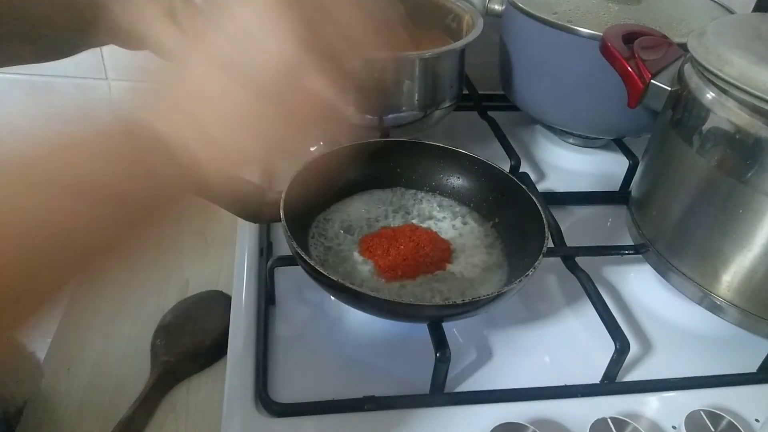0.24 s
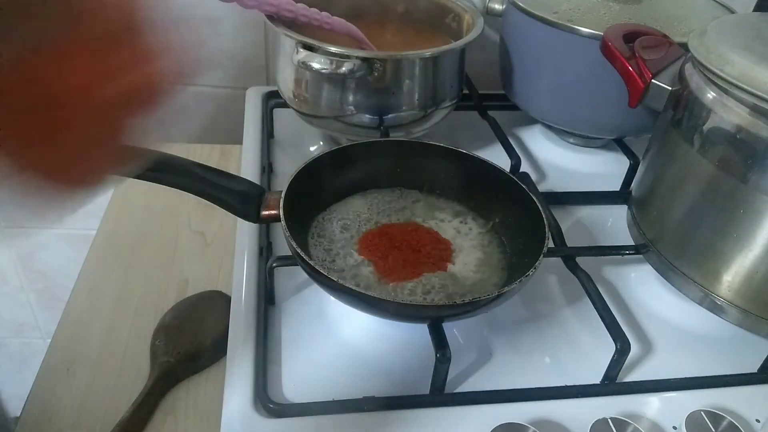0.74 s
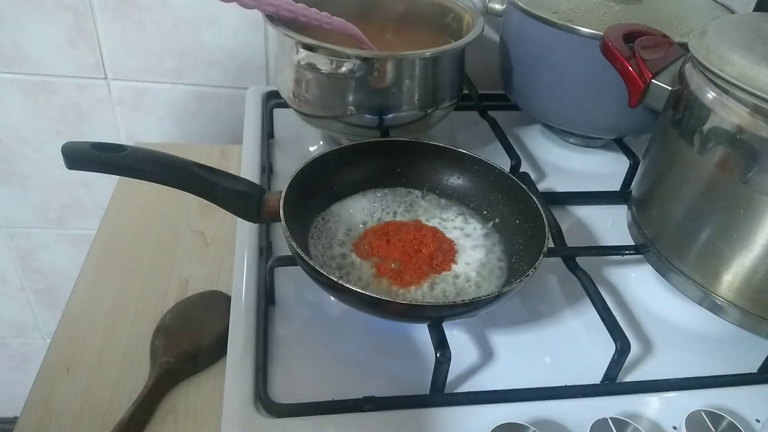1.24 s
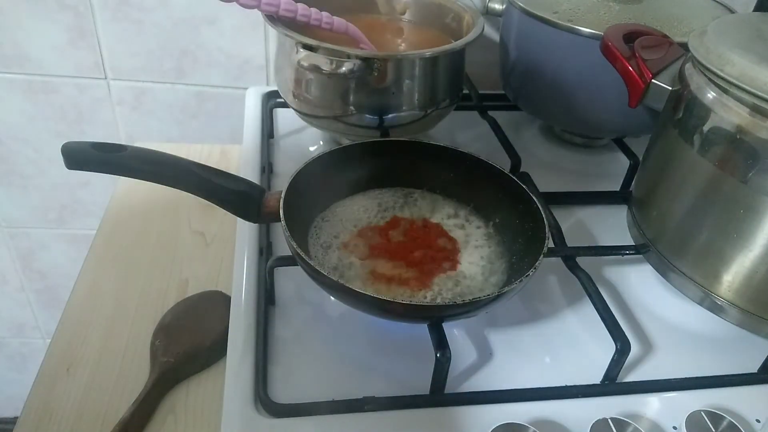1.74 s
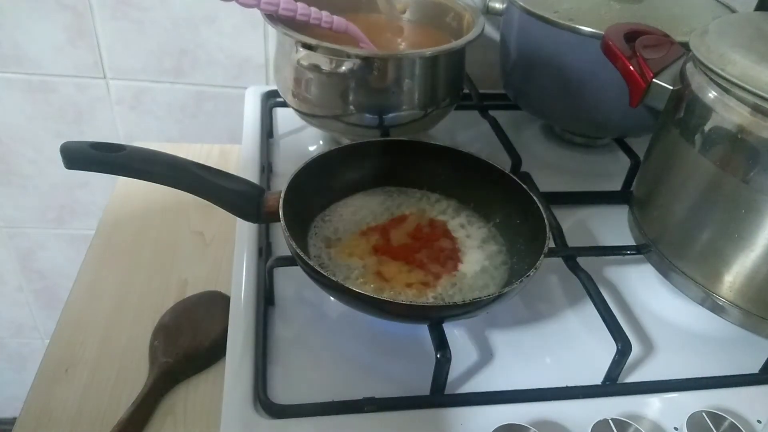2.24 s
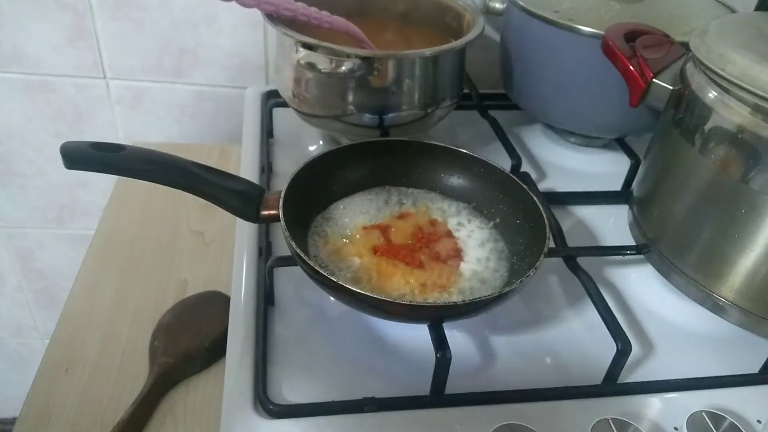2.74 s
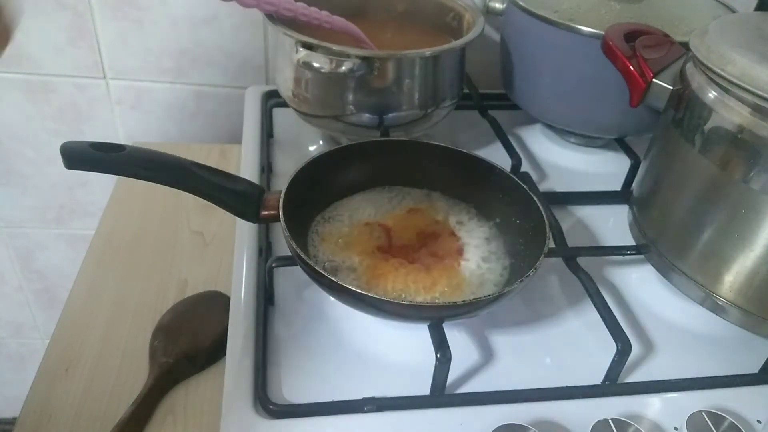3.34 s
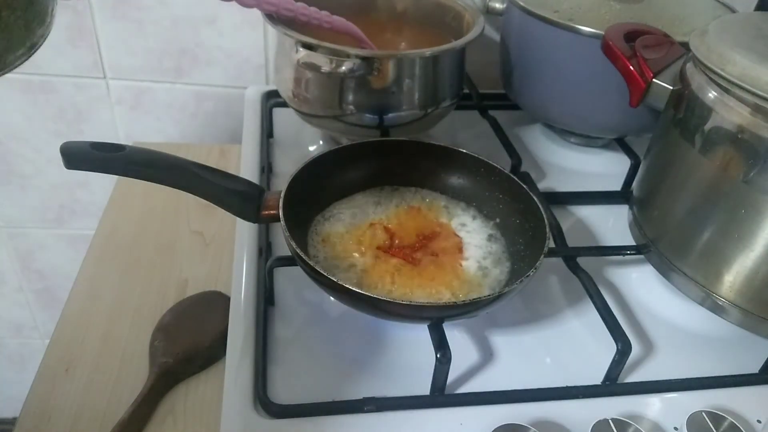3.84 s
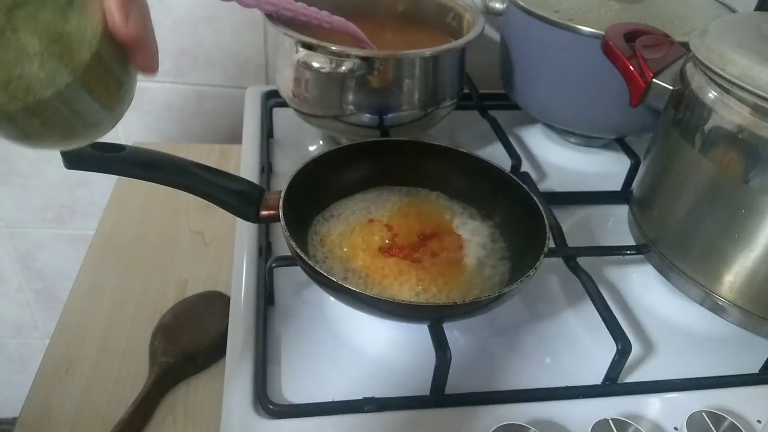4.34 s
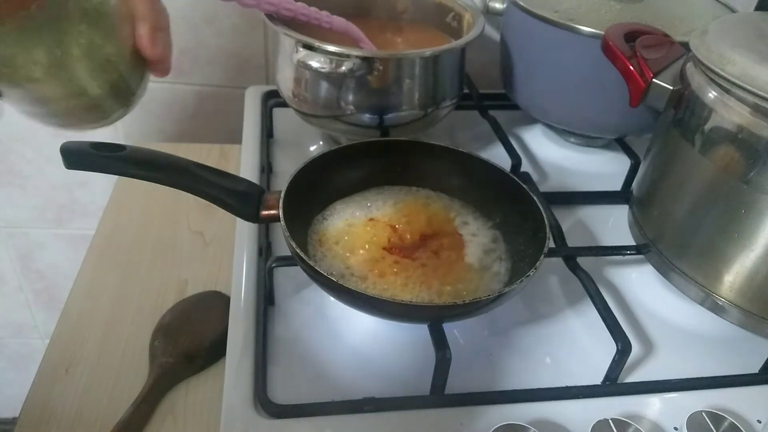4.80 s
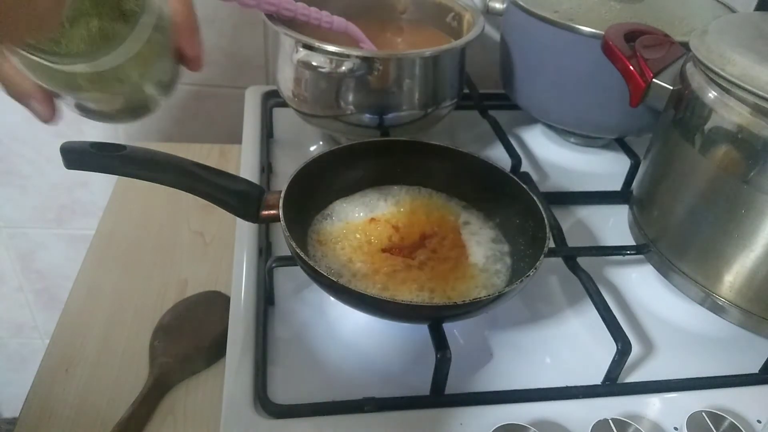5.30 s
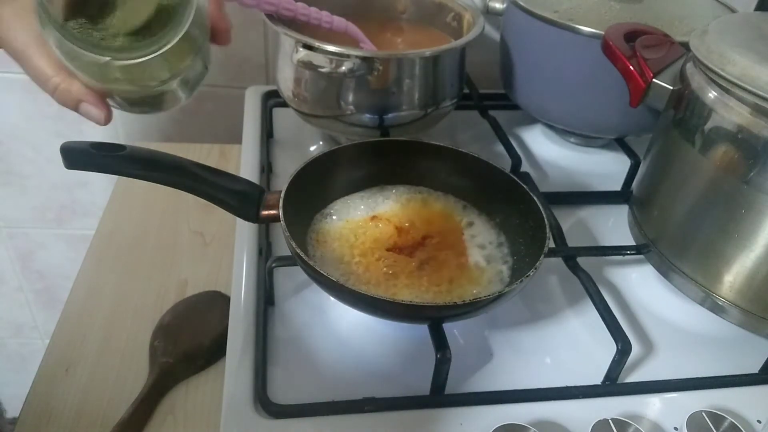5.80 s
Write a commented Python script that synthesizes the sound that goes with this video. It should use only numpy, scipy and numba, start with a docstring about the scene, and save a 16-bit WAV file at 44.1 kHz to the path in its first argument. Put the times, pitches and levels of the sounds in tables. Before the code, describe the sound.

Steady crisp sizzle and popping fat in a tiled kitchen, broken by hard wooden thumps and a rattling, scraping jar lid being unscrewed.

```python
"""Butter foaming in a pan, tiled kitchen

A frying pan on a gas stove, heard by a phone about a metre away; burner and air wash low behind it.
Steam bubbles burst as short ringing grains over a fine hiss, and fat spits in puffs of bright noise.
Jars knock on a wooden counter and a metal lid clinks and scrapes on a glass jar, as modes struck to ring.
The floor thuds under the cook's feet as filtered noise; delay lines echo pan and hands off the tiles."""
import sys
import numpy as np
from scipy import signal
from scipy.fft import rfft, irfft
from scipy.io import wavfile
from scipy.ndimage import uniform_filter1d
from numba import njit

SR = 44100
rng = np.random.default_rng(int(sys.argv[2]) if len(sys.argv) > 2 else 0)


def persist_wave(psi):
    """Save psi, clipped to +-1, as 16-bit WAV."""
    counts = np.round(np.clip(psi, -1, 1) * 32767).astype(np.int16)
    wavfile.write(sys.argv[1], SR, np.atleast_2d(counts).T)


N = 267246

# Burner and air, spectrum: f/Hz, relative level per Hz/dB
KITCHEN_SPECTRUM = [(15, -51.5), (25, -39), (86, -3.5), (172, -36), (226, -5), (318, -4), (405, 5.5),
                    (525, -7.5), (618, 4), (681, -20), (738, 4), (788, -37), (882, 2), (1200, -17),
                    (1560, -4), (2640, -120)]
# Foam activity: t/s, small-bubble level/dB, large bubbles above them/dB, fine spray above them/dB
FOAM_ACTIVITY = [(0, -29.5, -1, -2.5), (.3, -27, -5, -10), (.7, -29.5, -3, -6), (1.1, -28.5, -4.5, -8.5),
                 (1.5, -30.5, 0, -6), (1.9, -29, -3, -10.5), (2.3, -28.5, -1, -9), (2.7, -29, -2.5, -8),
                 (3.1, -30.5, -3, -8), (3.55, -29.5, -5.5, -10), (4.0, -31.5, -2, -8.5),
                 (4.5, -30.5, -2.5, -10), (4.9, -33, -3, -8.5), (5.45, -30.5, -2.5, -9),
                 (6.06, -32, -3, -9.5)]
# Foam through pan and microphone: f/Hz, relative level per Hz/dB
FOAM_SPECTRUM = [(250, -51), (420, -15.5), (680, -29), (900, -20), (1400, -19), (1900, -12.5), (2400, -5),
                 (3300, -3.5), (4200, -6), (4900, -2.5), (5450, 1.5), (6200, -5), (7200, -10.5),
                 (9000, -30.5), (15000, -41)]
# Fine spray: f/Hz, relative level per Hz/dB
SPRAY_SPECTRUM = [(5000, -6), (8000, 18), (11000, 7.5), (16000, 3.5)]
# Left microphone port, pan bed only: f/Hz, level over the right port/dB
LEFT_PORT_RESPONSE = [(300, 0), (1300, .8), (2400, 1.5), (4300, 5), (6000, 4.5), (8500, -2), (15000, .8)]
# Single bubble bursts, loud and faint: t/s, peak level before the band filter/dB,
# starting pitch f/Hz, left minus right/dB, decay/cycles (at least 1 is used)
BUBBLE_BURSTS = [(0.0493, -21, 5680, 1.5, 2.1), (0.138, -5.5, 5000, 3.5, 4), (0.188, -10, 5530, 3.5, 4.4),
                 (0.3426, -17, 5160, 5.5, 2.5), (0.3583, -4, 5250, 9, 2.6), (0.377, -10, 5400, 3.0, 2.9),
                 (0.4585, -13.5, 2600, 4.0, 5.3), (0.5272, -17, 5300, 2.5, 2.5),
                 (0.5535, -14, 4410, 3.5, 2.5), (0.6606, -10, 4260, 3.5, 3.6), (0.6883, -10, 3570, -1, 3.7),
                 (0.7853, -6, 5480, -3, 2.5), (0.817, -15, 5340, 2.5, 2.5), (0.8929, -17, 5300, 3.5, 2.5),
                 (0.9284, -12, 4680, 6, 2.5), (0.9802, -13.5, 3630, 6.5, 3.5), (1.0036, -10, 5810, 10, 3.1),
                 (1.031, -20, 5200, 3.5, 2.5), (1.0834, -26, 5380, 4.5, 2.3), (1.14, -3, 5100, 7, 2.2),
                 (1.1812, -7, 5240, 5.0, 2.2), (1.2727, -9, 5550, 5, 2.3), (1.3209, -20, 5740, 4.0, 2.5),
                 (1.3618, -11, 2600, -1, 2.7), (1.4207, -7.5, 5390, 3.5, 2.5), (1.533, -15, 5730, 3.5, 2.5),
                 (1.5405, -16, 4540, 2.0, 2.2), (1.5698, -16, 5430, 3.0, 2.5),
                 (1.6536, -19, 5370, 3.0, 2.5), (2.0536, -9, 5260, 6, 2.7), (2.157, -16, 5100, 7, 2.5),
                 (2.1825, -13, 5370, 4.5, 2.3), (2.2389, -26, 5430, 4.5, 2.5), (2.2892, -24, 5300, 7, 2.5),
                 (2.375, -12, 2580, 4.0, 2.3), (2.403, -10.5, 3870, 3.5, 2.7), (2.5931, -13, 5660, 1, 2.5),
                 (2.636, -12, 5370, 5.5, 2.5), (2.6876, -7.5, 5150, 3.0, 2.5),
                 (2.8744, -15, 5400, 5.0, 2.5), (2.9684, -16, 5660, 5.0, 2.5),
                 (3.0054, -11, 3040, 3.0, 4.6), (3.055, -6.5, 5200, 3.5, 3), (3.0809, -14, 5380, 4.0, 2.5),
                 (3.1425, -14, 3220, 4.0, 2.8), (3.2073, -10.5, 2650, 5, 3.4),
                 (3.3668, -18, 4370, 3.0, 2.5), (3.504, -18, 5260, 6.5, 2.5), (3.514, -20, 5150, 5.0, 2.5),
                 (3.5529, -25, 5380, 2, 2.8), (3.6122, -25, 5140, 3, 2.5), (3.6289, -14, 4340, 1, 2.8),
                 (4.348, -13, 5400, 2.0, 2.2), (4.3897, -16, 5440, 3.0, 2.3),
                 (4.494, -12.5, 5660, 4.0, 3.6), (4.5643, -19, 3290, 2, 3.6), (4.6995, -24, 5500, 0, 2.2),
                 (4.72, -15, 5600, 3.5, 2.5), (4.8317, -22, 5580, 3.5, 2.5), (4.8725, -18, 2350, 6, 1.4),
                 (4.8916, -17, 5400, 3.0, 2.5), (4.9465, -30, 5570, 2, 2.5), (5.0185, -15, 5030, 2.5, 2.5),
                 (5.0993, -8.5, 5100, 3, 3.3), (5.142, -12, 5500, 4.0, 4.7),
                 (5.1972, -15.5, 2900, 4.0, 2.2), (5.258, -13, 5590, 4.0, 2.5),
                 (5.3271, -22, 5490, 4.5, 2.5), (5.3578, -12, 4440, 3.0, 3), (5.4229, -8, 5160, 6, 2.5),
                 (5.423, -14, 2900, 3, 2), (5.445, -20, 6060, 1, 2.5), (5.4648, -17, 5240, 4.0, 2.5),
                 (5.4735, -6, 5560, 3.0, 2.8), (5.5325, -9, 5120, 4.0, 2.5), (5.5534, -12, 5300, 3.5, 2.9),
                 (5.598, -15, 5550, 4.0, 2.3), (5.731, -16, 5460, 3.5, 2.5), (5.7475, -16, 5590, 4.0, 2.5),
                 (5.7816, -19, 5110, 2, 2.3), (5.8284, -10, 4200, 3.5, 2.3), (5.8544, -11, 5700, 4.0, 2.5),
                 (5.931, -15, 5450, 5.0, 2.5), (6.0125, -25, 5520, 3.5, 2.5), (0.0215, -14.5, 3040, 4, 3.5),
                 (0.3064, -20, 5570, 5.0, 2.5), (1.2504, -9, 5570, 6, 2.8), (1.5934, -13, 5560, 5, 2.5),
                 (2.3314, -11, 5400, 4.0, 2.5), (2.9474, -15, 5620, 5.5, 2.5), (3.2184, -12, 3070, 2, 2.5),
                 (3.2361, -14, 2570, 1.5, 2.7), (3.4454, -10, 5500, 4.0, 2.5), (4.903, -13, 4950, 2.5, 2.5),
                 (4.9124, -20, 5700, 3.5, 2.5), (4.9786, -17.5, 3100, -3, 3.2),
                 (5.1454, -9, 5550, 4.0, 3.1), (.832, -14, 2780, -1, 4.5), (.860, -17, 2300, 1, 2.5),
                 (3.231, -15, 5300, 3, 2.7), (3.183, -20, 5430, 6, 2.6), (4.843, -25, 1470, 3.0, 1.5),
                 (4.861, -29, 1520, 2.0, 1.5), (0.205, -12.5, 2000, 1.5, 2.3), (0.785, -26, 3010, 1.0, 2.2),
                 (0.945, -26, 3020, 1.5, 2), (1.218, -14, 2570, 0.5, 2.5), (1.242, -20, 3120, -0.5, 1.7),
                 (1.3628, -11, 5000, 2, 2.6), (1.391, -23, 3170, 1.5, 1.7), (1.451, -25, 2620, 1.5, 2),
                 (1.534, -16, 2660, 0.0, 2.2), (1.57, -15, 1680, -2, 2.9), (3.897, -10.5, 2650, 1, 2),
                 (3.905, -11, 2900, 6, 1.9), (3.996, -14, 2660, 1.5, 2.3), (4.015, -25, 3160, -1.0, 1.8),
                 (4.212, -17, 3160, 2.0, 2), (4.422, -12, 2000, -2, 1.6), (4.648, -15, 2390, 3.0, 1.8),
                 (4.831, -19, 2280, 2.5, 1.8), (5.051, -22, 1980, 0.0, 2), (5.164, -28, 2370, -1, 2),
                 (5.795, -13.5, 2480, 1.0, 2.2), (5.809, -12, 2810, 1.5, 1.7)]
# Footfalls: t/s, level/dB, weight shift/s
FOOTFALLS = [(.03, -57, 0.045), (.68, -65, 0.045), (1.38, -49, 0.069), (1.55, -70, 0.026),
             (1.76, -41.5, 0.14), (1.95, -40, 0.14), (2.5, -61, 0.14), (3.06, -64, 0.0274),
             (4.94, -61, 0.035)]
# Floorboards: f/Hz, relative level per Hz/dB
FLOOR_SPECTRUM = [(40, -25), (70, -17.5), (98, -17), (108, -3), (118, -13.5), (150, -31), (260, -39)]
# Fat spitting in short broad spurts: t/s, level before the spectrum below/dB
FAT_SPURTS = [(0.055, -30), (.09, -45), (.229, -35), (.355, -32), (0.558, -32), (.831, -22.5),
              (0.982, -28.5), (1.03, -33), (1.551, -34), (1.698, -42), (2.329, -34), (2.682, -32),
              (4.484, -36), (5.262, -37), (5.439, -34), (5.717, -37)]
# Spurting fat: f/Hz, gain/dB
SPURT_SPECTRUM = [(1500, -24), (4000, 9), (7000, 9.5), (11000, 0), (16000, -2)]
# Jars on the counter: t/s, level/dB, contact/ms, left minus right/dB,
# pitch favoured by the spot f/Hz, share of each t60 kept/1
JAR_KNOCKS = [(.564, -43, .5, 8, 600, 0.62), (.845, -31, 0.4, -1, 760, 1.1),
              (1.498, -27, 0.21, 1, 1070, 0.9), (1.567, -28, 0.27, 0, 1040, 1),
              (1.750, -6, 0.33, -1, 1100, 0.25), (1.7555, -7.5, 0.52, 2, 790, 0.64),
              (1.769, -19, .3, -7, 1500, 0.4), (1.762, -15, 0.45, 0, 307, 1), (1.778, -22, .4, 0, 620, 1),
              (1.9465, -8.5, 0.2, 6, 885, 0.37), (1.952, -10, 0.28, 0, 790, 0.5),
              (1.9585, -8, 0.24, -10, 900, 0.78), (1.966, -13, .3, 6, 700, 0.24),
              (1.974, -6, 0.26, 3, 910, 0.4), (1.9797, -6.5, 0.34, 4, 910, 0.7),
              (1.987, -11, 0.55, 0, 342, 0.98), (2.678, -18, 1.4, 9, 750, 0.24),
              (2.682, -35, 2, 3, 240, 0.5), (2.872, -43, 1.7, 7, 372, 0.5)]
# Wooden counter modes: f/Hz, relative level/dB, t60/s
COUNTER_MODES = [(177, -21, 0.1), (245, -13.5, 0.35), (299.3, -2, 0.23), (367, -8.5, 0.31), (473, -1, 0.12),
                 (604, -8.5, 0.42), (667, -2.5, 0.27), (767, -2, 0.26), (822, -0.5, 0.11),
                 (916.4, -10, .38), (943, 2.5, 0.1), (1095, 2, 0.14), (1331, 5.5, 0.154), (1542, 1, 0.27),
                 (1866, 7.5, 0.145), (2020, 0.5, 0.45)]
# Soft noise just ahead of a knock: t/s, level/dB, time before it dies away/s
SOFT_LEAD_INS = [(.829, -39.5, 0.046), (1.696, -46, .045)]
# Soft noise ahead of a knock: f/Hz, relative level per Hz/dB
LEAD_IN_SPECTRUM = [(120, -27), (250, -3), (450, 2), (900, -1), (1500, -14), (3000, -20), (6000, -40)]
# Lid against jar: t/s, level/dB, glass against lid/dB, scrape/dB, left minus right/dB,
# two pitches favoured by the spot f/Hz and f/Hz, share of each lid and glass t60 kept/1
LID_CLINKS = [(3.692, -3.5, -17, -7, -2.5, 3960, 4555, 1.06),
              (3.7104, -5.5, -16.5, -14, 3, 3750, 5790, 1.07),
              (3.734, -14, -13.5, -22.5, 2, 5790, 5486, 0.8),
              (3.828, -4.5, -34.5, -6.5, 1, 5360, 2610, 0.52), (3.836, -9, -32, -13, -2, 3825, 5790, 0.35),
              (3.847, -20, -13, -10, 2, 4760, 5790, 0.4), (3.928, -6.5, -29, -3.5, 6, 5460, 4800, 0.75),
              (3.938, -13, -24, -2, -5, 5430, 3900, 0.6), (3.9454, -12, -28, -2, 0, 5476, 5790, 0.2),
              (4.0177, -7, -31, -0.5, 0, 5400, 4750, 0.5), (4.055, -30.5, -2, -12.5, 0, 5400, 3200, 0.24),
              (4.1009, -9, -29, 5.5, 4, 5500, 3750, 0.7), (4.108, -14, -28, -6, 0, 3190, 3700, 1),
              (4.122, -14.5, -26, -3, -1, 3190, 5790, 0.8), (4.1695, -14, -27, 0, 1, 5400, 3190, 0.13),
              (4.1729, -5.5, -30, -4.5, 2, 5470, 3780, 0.57), (4.178, -5.5, -34, -12, 2, 2400, 5450, 0.3),
              (4.2368, -6, -34, -1, 0, 4750, 5790, 0.57), (4.249, -6, -21, -12, 0, 3700, 2610, 0.38),
              (4.286, -18, -30, -4, -1, 3190, 2630, 0.37), (4.296, -9, -28, -8, -1.5, 3825, 3190, 0.7),
              (4.329, -15, -32, -6, -2, 3750, 3190, 0.5), (4.35, -11, -30, -4, -1, 5470, 3650, 0.05)]
# Metal lid modes: f/Hz, relative level/dB, t60/s
LID_MODES = [(2410, -2, 0.07), (2610, -3, 0.05), (3190, -4, 0.4), (3630, 1.5, 0.14), (3830, 3.5, 0.086),
             (3950, 3.5, 0.1), (4510, 0, 0.14), (4780, 1, 0.1), (5000, -4, .1), (5150, -9, .12),
             (5510, 0, .14), (5400, 4, 0.1), (5790, -3, 0.38), (6540, -10, .06)]
# Jar wall and the air inside, modes: f/Hz, relative level/dB, t60/s
GLASS_MODES = [(315, -9, 0.16), (387, -5, 0.13), (653, -4.5, 0.074), (978, 6, 0.2), (1457, -5, 0.3)]
# Lid thread scraping: f/Hz, relative level per Hz/dB
SCRAPE_SPECTRUM = [(200, -43), (800, -7.5), (2500, -15), (5400, 11), (8000, -6), (15000, -23)]
# Tiled walls, one lag for each of eight delay lines: t/ms
TILE_LAGS_MS = [11.3, 14.9, 19.1, 23.7, 29.3, 34.9, 41.3, 47.9]

KITCHEN_DB, KITCHEN_FADE_DB_PER_S = -58, 0.8
SURGE_PER_S, SURGE_DB = 25, 1.0  # common to the foam bed and spray
SEETHE_PER_S, SEETHE_DB = 20, (-0.5, 1.23, 1.16)  # depth of surge and sag: small, large, spray
LESSER_POPS, LESSER_DB = 120, 8.5  # count, level above the small bubbles
LESSER_HZ, LOW_HZ, LOW_SHARE = 5240, 2870, .3  # usual pitch, deep pitch, share of deep ones
POP_PAN_DB, POP_SCATTER_DB = 5, 8.5  # left minus right, for the lesser bursts
# Neighbours that a burst sets off: count, within/s, level/dB, pitch scatter/1
FOLLOWERS, FOLLOW_S, FOLLOW_DB, FOLLOW_SPREAD = 3, .005, -7.5, .12
BURST_DELAY_S = .0011  # every burst sounds this long after its listed or drawn time
SNAP_DB, SNAP_SCATTER_DB = -12, 2.5  # short broad snap at the start of every burst, against its ring
SPURT_S = 0.03
CRACK_DB, CRACK_S = -15.5, 0.00094  # first contact of jar and wood
WOOD_BLUR_S, LID_BLUR_S, GLASS_BLUR_S = .3, .15, .25  # modes of longer t60 are purer in proportion
ROOM_T60_S, ROOM_DAMP = 0.43, .45  # t60 before damping; smoothing of every round, 0-1
TOP_HZ = 15700


def undb(db):
    """dB to gain."""
    return 10 ** (np.asarray(db) / 20)


def level(x, db):
    """Scale to an rms level."""
    return x * undb(db) / np.sqrt(np.mean(x ** 2))


def sides(pan_db):
    """Left and right gains."""
    return undb(np.array([pan_db, -pan_db]) / 2)


def colour(x, points):
    """Causal filter through f/Hz, level/dB points, from the folded cepstrum."""
    hz, db = np.transpose(points)
    grid = np.fft.rfftfreq(8192, 1 / SR) + 1
    cepstrum = irfft(np.interp(np.log(grid), np.log(hz), db) * np.log(10) / 20)
    cepstrum[1:4096] *= 2
    cepstrum[4097:] = 0
    impulse = irfft(np.exp(rfft(cepstrum)))[None, :4096]
    return signal.fftconvolve(x, impulse, axes=1)[:, :N]


def walk(rate):
    """Random levels held 1 / rate s and slewed twice; spread near 1."""
    k = int(SR / rate)
    held = np.repeat(rng.standard_normal(N // k + 1), k)
    return 1.3 * uniform_filter1d(uniform_filter1d(held, k), k)[:N]


def rare(u, step_db, top_db):
    """Gains of many faint and few strong bursts, the strongest capped."""
    return undb(np.minimum(-step_db * np.log(u), top_db))


def add(out, s, y):
    """Mix y into out from time s."""
    i = max(int(s * SR), 0)
    out[:, i:i + y.shape[1]] += y[:, :N - i]


@njit
def grains(count, start, hz, cycles, glide, gain):
    """Damped sines: swell in a third of a period, lose 1/e in `cycles`, rise as the bubble opens."""
    out = np.zeros((2, count))
    for k in range(len(hz)):
        period = SR / hz[k]
        steps = cycles[k] * period
        for c in range(2):
            first = int(start[c, k]) + 1
            for i in range(max(first, 0), min(first + int(5 * steps) + 1, count)):
                t = i - start[c, k]
                shape = np.exp(-t / steps) - np.exp(-3 * t / period - t / steps)
                out[c, i] += gain[c, k] * shape * np.sin(2 * np.pi * t / period * (1 + glide * t / steps))
    return out


def bubbles(s, hz, cycles, size, pan_db, lag_spread):
    """Bursts at scattered places in the pan: each has its own lag between the ports, in samples."""
    lag = lag_spread * rng.standard_normal(len(s))
    return grains(N, s * SR + np.array([lag, -lag]), hz, cycles, 0.048, size * sides(pan_db))


def ring(modes, blur_s, contact_ms, rise_ms, spread, spots_hz, spot_octaves, spot_db, kept,
         chatter_db, count):
    """One blow on clustered modes: long contact dulls, the spot selects, a hand damps; peak 1 bar chatter."""
    hz, db, t60 = np.repeat(np.array(modes, float), count, axis=0).T[:, :, None]
    t = np.arange(SR // 6) / SR
    chance = rng.standard_normal((4, len(hz), 1))
    dull = 1 / (1 + (hz * contact_ms / 1000) ** 4)
    away = np.min([np.abs(np.log2(hz / spot)) for spot in spots_hz], axis=0)
    # ports agree in the bass and drift apart in the treble
    shift = np.clip(hz / 800 - .3, 0, 1.2) * chance[3]
    mode_db = db - spot_db * np.minimum(away / spot_octaves, 1) + 3.2 * chance[0]
    size = dull * undb(mode_db) * np.exp(-np.log(1000) * t / (t60 * kept))
    detune = 1 + spread * np.minimum(blur_s / t60, 1) * chance[1]
    turn = 2 * np.pi * hz * detune * t + .5 * chance[2]
    left = np.sum(size * np.sin(turn + shift), axis=0)
    right = np.sum(size * np.sin(turn - shift), axis=0)
    y = np.array([left, right]) * (1 - np.exp(-t * 1000 / rise_ms))
    # loose parts chatter once the blow has landed and break up the ring
    shake = uniform_filter1d(np.repeat(rng.standard_normal(len(t) // 200 + 1), 200), 200)[:len(t)]
    return y / np.abs(y).max() * undb(chatter_db * shake * np.minimum(t / 0.014, 1))


def kitchen():
    """Burner and air: a low, wavering wash, nearly alike at both ports, slowly settling."""
    noise = rng.standard_normal(N) + 0.11 * rng.standard_normal((2, N))
    fade_db = KITCHEN_FADE_DB_PER_S * (np.arange(N) - N / 2) / SR
    return level(colour(noise, KITCHEN_SPECTRUM), KITCHEN_DB) * undb(0.83 * walk(5.08) - fade_db)


def sizzle():
    """Large and small bubbles and the spray each follow the heat and seethe in their own way."""
    s, small, large, fine = np.transpose(FOAM_ACTIVITY)
    surge_db = SURGE_DB * walk(SURGE_PER_S)
    slow_db = [np.interp(np.arange(N) / SR, s, c) for c in (small, small + large, small + fine)]
    small_db, large_db, spray_db = (
        c + surge_db + db * walk(SEETHE_PER_S) for c, db in zip(slow_db, SEETHE_DB))
    froth = foam()
    # large bubbles are the foam below 3900 Hz, small ones the rest
    low = signal.sosfiltfilt(signal.butter(3, 3900, fs=SR, output="sos"), froth)
    bed = undb(small_db) * level(froth - low, 0) + undb(large_db) * level(low, 0)
    bed += undb(spray_db) * spray()
    bed[:1] = colour(bed[:1], LEFT_PORT_RESPONSE)
    return bed + pops(slow_db[0]) + spurts()


def foam(count=16000):
    """Dense bubbles of every pitch and one-sample crackle in seething patches, over a smooth hiss."""
    chance = rng.random((count, 5)).T
    hz = 500 * (15000 / 500) ** chance[1]
    # size rises with pitch so that the swarm is flat before pan and microphone colour it
    size = hz * rare(chance[2], 3.2, 6.0) * np.sign(chance[3] - .5)
    pan_db = 4.6 * rng.standard_normal(count)
    swarm = bubbles(chance[0] * N / SR, hz, 1.17 + 4.4 * chance[4], size, pan_db, 3.02)
    struck = rng.random(N) < 500 / SR  # about 500 snaps a second
    snaps = struck * rare(rng.random(N), 2.8, 4.0) * np.sign(rng.standard_normal(N))
    hiss = rng.standard_normal((2, N)) + 1.3 * rng.standard_normal(N)
    froth = level(swarm, 0) * undb(.7 * walk(60)) + level(snaps, -8) + level(hiss, -5)
    return level(colour(froth * undb(.8 * walk(30)), FOAM_SPECTRUM), 0)


def spray(count=6000):
    """Tiny droplets crackle in the treble as single-sample ticks over noise."""
    ticks = np.zeros((2, N))
    chance = rng.random((count, 4)).T
    side, place = (2 * chance[0]).astype(int), (N * chance[1]).astype(int)
    ticks[side, place] = rare(chance[2], 4.1, 9.5) * np.sign(chance[3] - .5)
    mist = rng.standard_normal((2, N)) + 0.19 * rng.standard_normal(N)
    flicker_db = 0.64 * np.array([walk(19), walk(18)])
    return level(colour(level(ticks, -2.9) + mist, SPRAY_SPECTRUM), 0) * undb(flicker_db)


def pops(foam_db):
    """Listed and random bursts each set off neighbours; a small bubble sends out no bass."""
    chance = rng.random((LESSER_POPS, 3)).T
    scatter = rng.standard_normal((LESSER_POPS, 3)).T
    when = chance[0] * N
    pitch = np.where(chance[1] < LOW_SHARE, LOW_HZ, LESSER_HZ) * np.exp(0.148 * scatter[0])
    lesser = [when / SR, foam_db[when.astype(int)] + LESSER_DB + 0.86 * scatter[1], pitch,
              POP_PAN_DB + POP_SCATTER_DB * scatter[2], 1 + 4.1 * chance[2]]
    first = np.hstack([np.transpose(BUBBLE_BURSTS), lesser])
    after = np.repeat(first, FOLLOWERS, axis=1)
    late, loose = rng.random(after.shape[1]), rng.standard_normal((after.shape[1], 2)).T
    after[0] += FOLLOW_S * late
    after[1] += FOLLOW_DB * (1 + late) + 1.0 * loose[0]  # later is fainter
    after[2] *= np.exp(FOLLOW_SPREAD * loose[1])
    s, db, hz, pan_db, cycles = np.hstack([first, after])
    s, cycles = s + BURST_DELAY_S, np.maximum(cycles, 1)
    # the first crest comes when part of the ring has already died
    burst = bubbles(s, hz, cycles, undb(db) * np.exp(0.45 / cycles), pan_db, .4)
    snap_hz = 4000 * np.exp(0.36 * rng.standard_normal(len(s)))
    snap_db = db + SNAP_DB + SNAP_SCATTER_DB * rng.standard_normal(len(s))
    snap = bubbles(s, snap_hz, np.full(len(s), .8), undb(snap_db), pan_db, 0.45)
    band = signal.butter(2, [1200, 9000], "band", fs=SR, output="sos")
    return signal.sosfilt(band, burst + snap)


def feet():
    """Weight rolling onto the floor rumbles in its low modes, then dies away."""
    t = np.arange(N) / SR
    press = np.zeros(N)
    for s, db, hold in FOOTFALLS:
        rise = np.clip((t - s) / 0.011, 0, 1)
        press += undb(db) * rise * np.exp(-np.maximum(t - s - hold, 0) / 0.072)
    return level(colour(rng.standard_normal((1, N)), FLOOR_SPECTRUM), 0) * press


def spurts():
    """Each spurt is a puff of bright grit that swells fast and dies away."""
    out = np.zeros((2, N))
    t = np.arange(SR // 10) / SR
    puff = np.minimum(t / 0.0052, 1) * np.exp(-(t / SPURT_S) ** 2)
    for s, db in FAT_SPURTS:
        add(out, s, rng.standard_normal((2, len(t))) * undb(db) * puff)
    return colour(out, SPURT_SPECTRUM)


def counter():
    """Jars on wood crack and ring many modes, some after soft noise; the top is too small for deep bass."""
    out = np.zeros((2, N))
    t = np.arange(SR // 8) / SR
    for s, db, contact_ms, pan_db, spot_hz, kept in JAR_KNOCKS:
        gain = undb(db) * sides(pan_db)[:, None]
        blow = ring(COUNTER_MODES, WOOD_BLUR_S, contact_ms, rise_ms=0.46 * contact_ms + 0.25,
                    spread=0.05, spots_hz=[spot_hz], spot_octaves=0.96, spot_db=9.7, kept=kept,
                    chatter_db=4.0, count=7)
        crack = np.sin(2 * np.pi * spot_hz * t) * np.exp(-t / CRACK_S) * undb(CRACK_DB)
        add(out, s, gain * blow)
        add(out, s, gain * crack)
    for s, db, length in SOFT_LEAD_INS:
        noise = rng.standard_normal(len(t)) + 0.49 * rng.standard_normal((2, len(t)))
        soft = level(colour(noise, LEAD_IN_SPECTRUM)[:, :len(t)], db)
        add(out, s, soft * np.minimum(t / .012, 1) * np.exp(-np.maximum(t - length, 0) / .015))
    return signal.sosfilt(signal.butter(2, 150, "high", fs=SR, output="sos"), out)


def jar():
    """Each touch rings lid and glass, with a short gritty scrape."""
    out = np.zeros((2, N))
    t = np.arange(SR // 20) / SR
    scrape = np.exp(-t / 0.0073) + 0.36 * np.exp(-t / .001)
    for s, db, glass_db, scrape_db, pan_db, spot_hz, other_hz, kept in LID_CLINKS:
        gain = undb(db) * sides(pan_db)[:, None]
        lid = ring(LID_MODES, LID_BLUR_S, contact_ms=.06, rise_ms=0.083, spread=0.0087,
                   spots_hz=[spot_hz, other_hz], spot_octaves=0.13, spot_db=11.0, kept=kept,
                   chatter_db=2.5, count=3)
        glass = ring(GLASS_MODES, GLASS_BLUR_S, contact_ms=.1, rise_ms=2.1, spread=0.016,
                     spots_hz=[1030], spot_octaves=1.3, spot_db=6.3, kept=kept,
                     chatter_db=4.0, count=3)
        add(out, s, gain * (lid + undb(glass_db) * glass))
        grit = level(colour(rng.standard_normal((2, len(t))), SCRAPE_SPECTRUM)[:, :len(t)], -7.0)
        add(out, s, gain * undb(scrape_db) * grit * scrape)
    return out


@njit
def walls(x, lags, gain, damp):
    """Eight delay lines that feed each other, duller on every round."""
    line, soft, out = np.zeros((8, 4096)), np.zeros(8), np.zeros((2, len(x)))
    for i in range(len(x)):
        total = 0.
        for k in range(8):
            soft[k] += (1 - damp) * (gain[k] * line[k, (i - lags[k]) & 4095] - soft[k])
            total += soft[k]
            out[k % 2, i] += soft[k]
        for k in range(8):
            line[k, i & 4095] = x[i] + soft[k] - total / 4
    return out


def scene():
    """Pan and hands close by, their echo from the tiles, the room behind."""
    pan, knocks, clinks = sizzle(), counter(), jar()
    lags = (np.array(TILE_LAGS_MS) * SR / 1000).astype(int)
    send = undb(-11.5) * pan + undb(-10.5) * knocks + undb(-11.5) * clinks
    echo = walls(send.mean(axis=0), lags, undb(-60 * lags / SR / ROOM_T60_S), ROOM_DAMP)
    return pan + knocks + clinks + echo + feet() + kitchen()


def record(dry):
    """The phone thins the deepest bass and cuts the top."""
    thin = signal.sosfilt(signal.butter(1, 60, "high", fs=SR, output="sos"), dry)
    return signal.sosfilt(signal.ellip(10, .2, 80, TOP_HZ, fs=SR, output="sos"), thin)


dry = scene()
out = record(dry)
persist_wave(out)
```